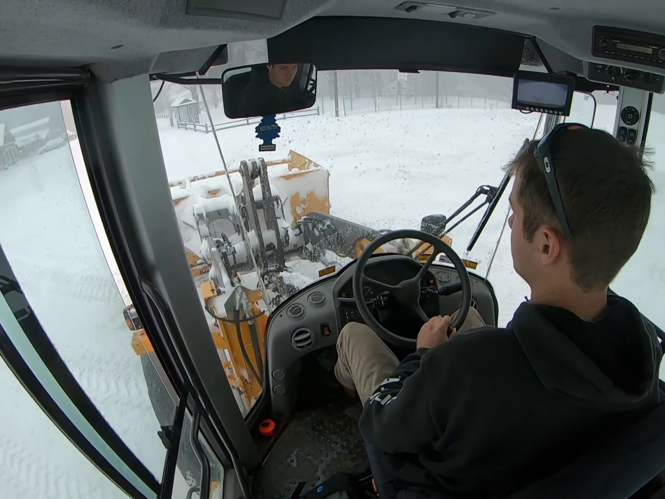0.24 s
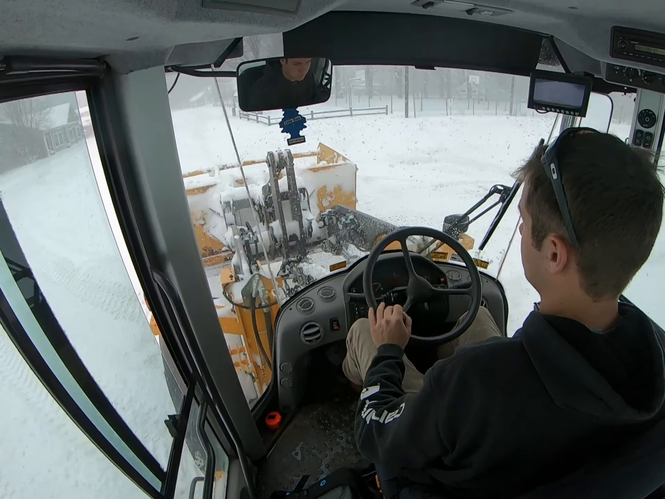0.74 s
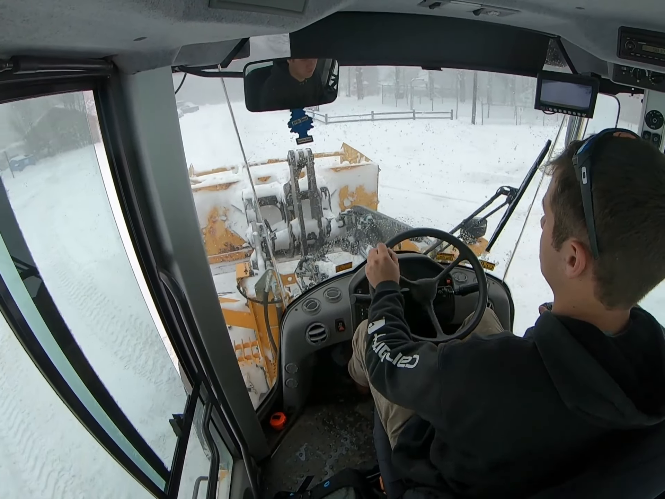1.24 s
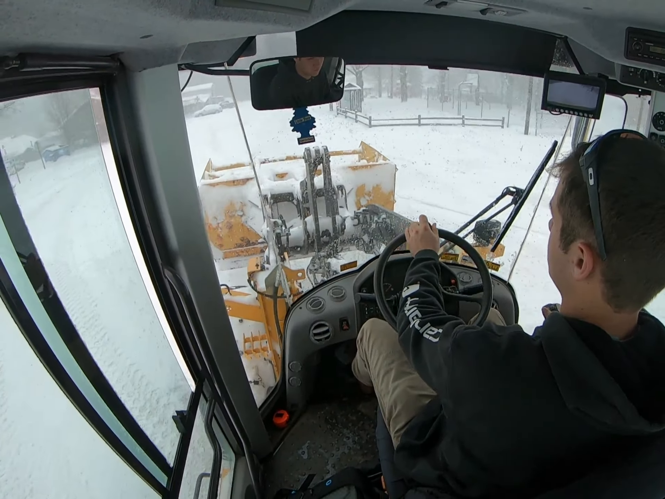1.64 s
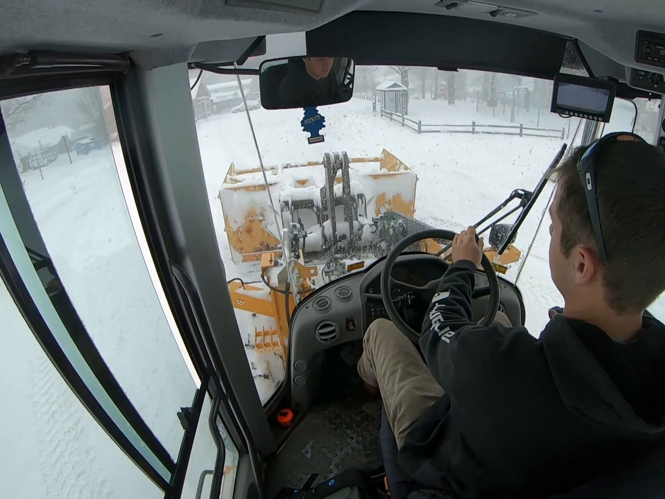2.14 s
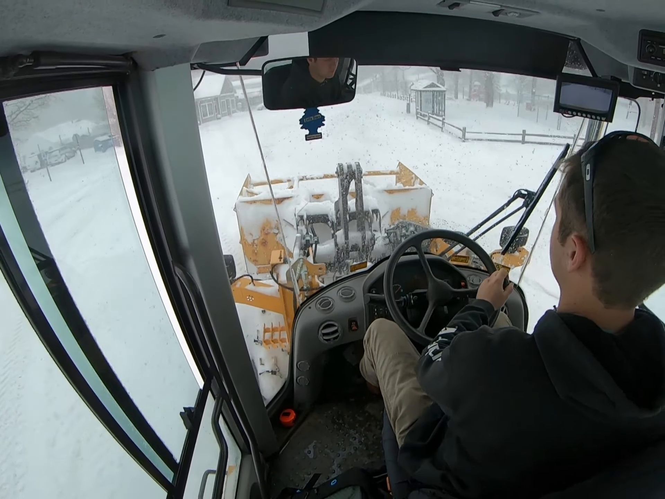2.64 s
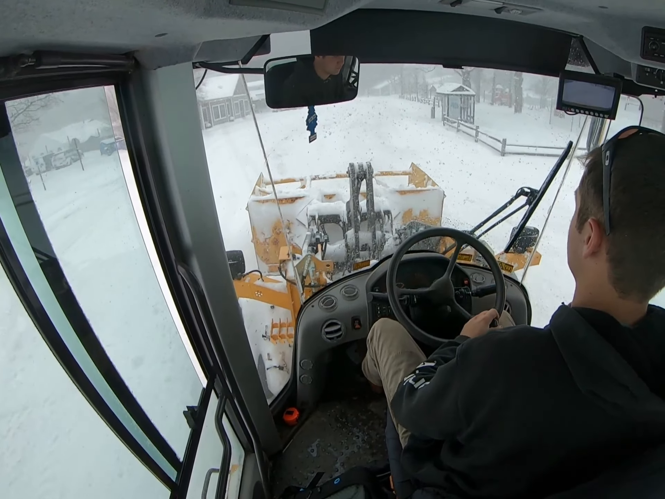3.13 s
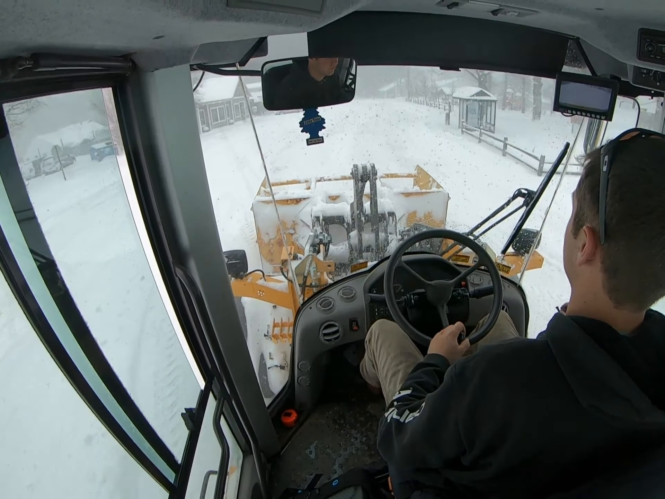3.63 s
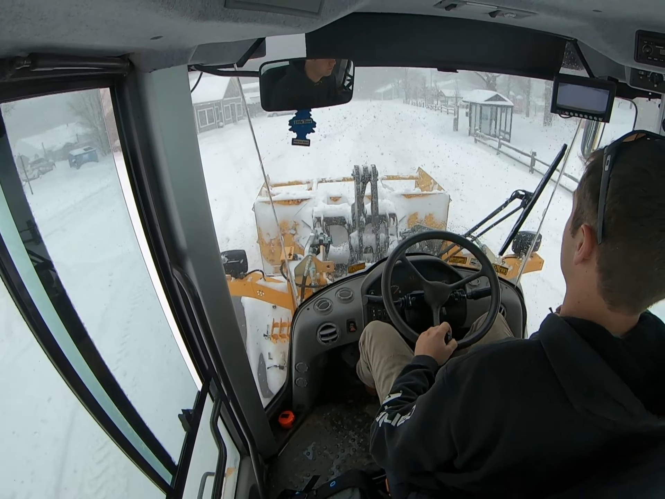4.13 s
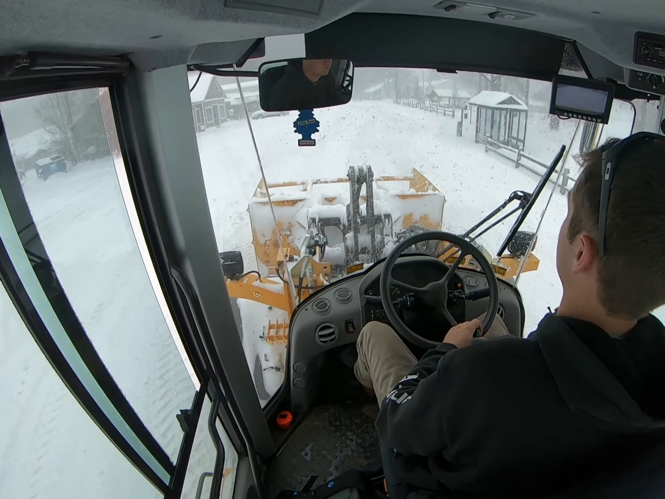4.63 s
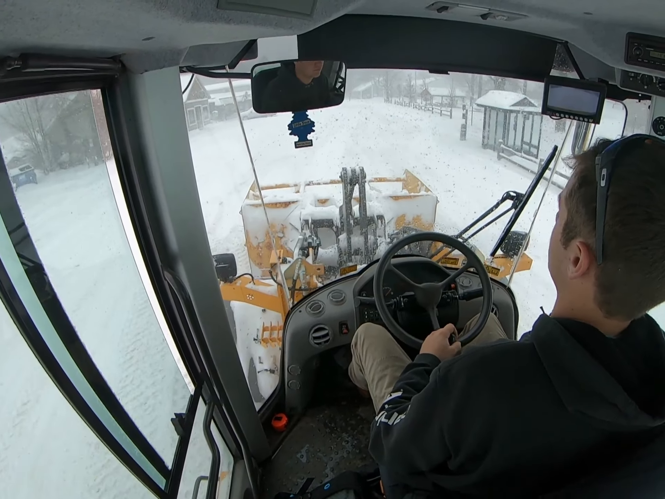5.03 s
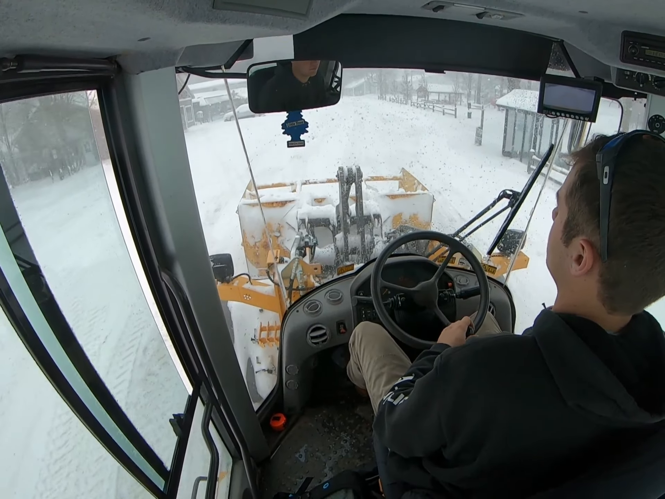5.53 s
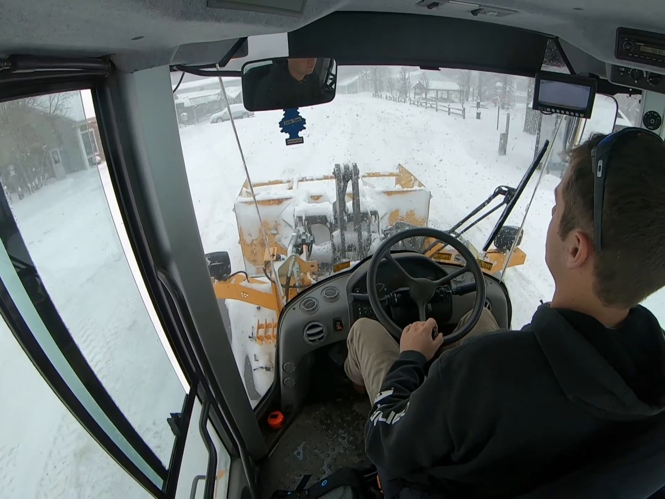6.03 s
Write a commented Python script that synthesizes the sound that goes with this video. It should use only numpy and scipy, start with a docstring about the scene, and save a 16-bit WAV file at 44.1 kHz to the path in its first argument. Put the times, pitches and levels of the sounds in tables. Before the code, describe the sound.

A wheel loader's diesel engine drones throughout, heard from one microphone inside the closed cab, with muffled mechanical clatter, whining pumps and gears, and a very deep, wavering cab boom. A small knock comes right at the start. The engine pitch rises noticeably during the first second, then keeps creeping upward. Uneven ground rumble from the tyres and plough fades toward 1.5 seconds and returns at about 2.7 seconds, along with a quick cluster of close knocks from loose plastic and metal fittings. From about 3.5 seconds the engine works harder and the hydraulic whine grows stronger, while faint gear tones swell, glide upward and fade. Single light rattles are scattered between 3 and 5 seconds, followed by a few tiny high ticks. The rumble is strongest near 5 seconds and eases slightly as the engine drones on to the end, just past 6 seconds.

```python
"""Wheel loader ploughing snow

One microphone inside the closed cab, as the loader pushes its plough and slowly gains speed.
A six-cylinder diesel drones and clatters through the wall, its pumps and gears whining.
The cab booms on its mounts, the ground rumbles through the frame, and loose fittings rattle."""
import sys
import numpy as np
from scipy import signal
from scipy.fft import rfft, irfft
from scipy.io import wavfile
from scipy.ndimage import uniform_filter1d, map_coordinates

SR = 44100
rng = np.random.default_rng(int(sys.argv[2]) if len(sys.argv) > 2 else 0)


def wav_record(signal):
    """Record a signal, one row per channel, as 16-bit PCM in the file named by sys.argv[1]."""
    frames = np.transpose(np.atleast_2d(signal))
    bounded = np.clip(frames, -1, 1)
    # unit amplitude maps onto the largest positive 16-bit level
    quanta = np.round(bounded * 32767).astype(np.int16)
    wavfile.write(sys.argv[1], SR, quanta)


N = 276507
CYLINDERS = 6


def amp(db):
    """Gain of a level in dB."""
    return 10 ** (np.asarray(db) / 20)


def unit_rms(x):
    """Scales x to rms 1."""
    return x / np.sqrt(np.mean(x ** 2) + 1e-20)


def curves(rows):
    """Turns rows of (time_s, values...) into one per-sample curve for each value."""
    time_s, *columns = np.transpose(rows)
    return [np.interp(np.arange(N) / SR, time_s, column) for column in columns]


def coloured(x, spectrum, peaks=()):
    """Filters x by (freq_hz, level_db) points and (centre_hz, width_hz, gain_db) peaks; rms 1."""
    points_hz, points_db = np.transpose(spectrum)
    hz = np.fft.rfftfreq(N, 1 / SR)
    shape_db = np.interp(np.log(hz + 1), np.log(points_hz + 1), points_db, -120, -120)
    return unit_rms(irfft(rfft(x) * amp(shape_db + resonance_db(hz, peaks)), N))


def resonance_db(hz, peaks):
    """Summed gain at hz of bell-shaped peaks and dips."""
    return sum(db / (1 + (2 * (hz - centre) / width) ** 2) for centre, width, db in peaks)


def drift(top_hz):
    """Slow random wander below top_hz, of rms about 1."""
    steps = rng.standard_normal(N // 512 + 40)
    lowpass = signal.butter(2, top_hz, fs=SR / 512, output="sos")
    steps = unit_rms(signal.sosfilt(lowpass, steps)[30:])
    return np.interp(np.arange(N) / 512, np.arange(len(steps)), steps)


def tone(turns, db, waver_db=1.0, waver_turns=.04, waver_hz=5):
    """A sine of rms level db that wavers a little in strength and phase."""
    phase = turns + rng.random() + waver_turns * drift(waver_hz)
    return np.sqrt(2) * amp(db + waver_db * drift(waver_hz)) * np.sin(2 * np.pi * phase)


def engine(cycles, load):
    """Diesel, hydraulic pump and crank-driven whines: tones shaded by load and by the cab's resonances."""
    # Engine harmonics: multiples of the four-stroke cycle rate
    harmonic_orders = [1, 2, 4, 7, 8, 11, 12, 14, 18, 21, 24, 26, 28, 32, 33, 38, 40, 42]
    # Their levels: unloaded_db, full_load_db
    harmonic_levels = [(-39, -42), (-31.5, -30), (-40, -38.5), (-33.5, -37.5), (-41, -38), (-33, -35.5),
                       (-39, -40), (-45.5, -42), (-59, -60), (-52.5, -55), (-56, -57.5), (-52, -53),
                       (-53, -53), (-55, -54.5), (-62.5, -59.5), (-61, -60.5), (-71.5, -74), (-71, -69)]
    # Whines of engine-driven parts: strokes_per_cycle
    whine_orders = [35, 36, 41.88, 45, 46.88, 53.25, 62, 66, 71.06, 75, 79.06, 82, 83.69, 88, 99.94, 105.06,
                    117.2, 125.62, 140.69, 176.06, 187.45, 210.88, 234.31, 257.81]
    # Their levels: unloaded_db, full_load_db
    whine_levels = [(-51.5, -57), (-50.5, -57), (-66.5, -67), (-75, -70.5), (-65, -66.5), (-67.5, -69),
                    (-66.5, -72.5), (-67, -73.5), (-67.5, -71.5), (-76, -68), (-72, -80.5), (-68, -82),
                    (-77.5, -71), (-63.5, -76), (-71, -70), (-69.5, -72), (-74, -73.5), (-73.5, -80.5),
                    (-69, -72), (-70.5, -77.5), (-76, -77.5), (-78, -79), (-74, -76.5), (-80.5, -77.5)]
    # Cab resonances and three dead spots that the tones glide through: centre_hz, width_hz, gain_db
    cab_modes = [(90.5, 10, 5.5), (148.5, 14, 6.5), (164, 10, 5), (269.4, 16, -13.5), (413.5, 5.3, 3),
                 (510, 35, 4.5), (738, 7.4, 8), (1390, 15, 3.5), (1922, 21, 9), (2178, 16, 8),
                 (2222, 30, 8), (2250, 12, -4), (2280, 45, 9), (2630, 90, 6), (2697, 14, 9), (2730, 30, -6),
                 (2814, 18, 16), (3592, 20, 5), (3760, 25, 5), (3905, 40, 6.5), (4135, 40, 5)]
    pump_order, hop = 17.74, 256  # strokes per cycle, samples
    cycle_hz = np.gradient(cycles[::hop]) * SR / hop

    def partial(order, unloaded_db, full_load_db, **waver):
        cab_db = np.repeat(resonance_db(order * cycle_hz, cab_modes), hop)[:N]
        level_db = unloaded_db + (full_load_db - unloaded_db) * load + cab_db
        return tone(order * cycles, level_db, **waver)

    out = partial(CYLINDERS, -25, -25, waver_db=.6, waver_turns=.012)  # firing note
    out += partial(9, -34.5, -32, waver_db=1.4, waver_turns=.018, waver_hz=2)
    out += partial(10, -30, -39.5, waver_db=1.4, waver_turns=.018, waver_hz=2)
    for order, levels_db in zip(harmonic_orders, harmonic_levels):
        out += partial(order, *levels_db, waver_db=3.0, waver_turns=.022, waver_hz=2.7)
    out += partial(pump_order, -40.5, -32.5)
    out += partial(2 * pump_order, -44, -54, waver_db=1.5, waver_turns=.02)
    for order, levels_db in zip(whine_orders, whine_levels):
        out += partial(order, *levels_db, waver_db=2.4, waver_turns=.08)
    return out


def clatter(cycles, level_db, repeat_db=-3.0, throb=0.14):
    """Valves, injectors and gears: knocks that return every cycle, and noise throbbing with each firing."""
    # Clatter as heard through the cab wall: freq_hz, level_db
    spectrum = [(450, -28.5), (600, -4.5), (660, -14), (830, -16.5), (1000, -12), (1400, -14),
                (2000, -14.5), (3000, -18), (4900, -27), (5400, -34), (6400, -39), (6800, -33.5),
                (7300, -38.5), (8300, -38.5), (9600, -46.5), (10300, -46), (11500, -60), (13000, -78)]
    # Cab wall resonances: centre_hz, width_hz, gain_db
    wall_modes = [(754, 87, 9.5), (900, 60, 4.5), (1184, 52, 6), (1612, 65, 6.5), (1940, 54, 1.5),
                  (2280, 71, 6), (2570, 29, 3.5), (2780, 97, 3), (3060, 45, 5), (3560, 90, 1.5),
                  (3980, 83, 4.5), (4420, 110, 4), (4650, 80, 3.5)]
    pattern = rng.standard_normal(2048)
    position = ((cycles + 0.00091 * drift(5.2)) * len(pattern)) % len(pattern)
    repeated = unit_rms(map_coordinates(pattern, [position], order=3, mode="grid-wrap"))
    firing_pulse = 1 + throb * np.cos(2 * np.pi * CYLINDERS * cycles)
    loose = rng.standard_normal(N) * firing_pulse * amp(1.4 * drift(30))
    return amp(level_db) * coloured(amp(repeat_db) * repeated + loose, spectrum, wall_modes)


def passing_whines(fade_share=0.23):
    """Whines, probably of gears, and one thin squeak: each swells in, glides evenly and dies away."""
    # Gliding tones: start_s, length_s, pitch_hz, climb_hz_per_s, level_db
    glides = [(-.2, .8, 402, 15, -41), (4.05, 2.6, 404, 29, -43), (3.15, 1.2, 476, 26, -46),
              (2.74, .53, 952, 50, -53.5), (3.75, .7, 1032, 72, -61), (2.685, .05, 8150, -11000, -72)]
    out = np.zeros(N)
    for start_s, length_s, pitch_hz, climb, level_db in glides:
        t = np.arange(N) / SR - start_s
        swell = np.clip(np.minimum(t, length_s - t) / (fade_share * length_s), 0, 1) ** 2
        turns = pitch_hz * t + climb * t ** 2 / 2
        out += swell * tone(turns, level_db, waver_db=2.5, waver_turns=.07, waver_hz=12)
    return out


def cab_drone(level_db):
    """Air and panels fill the cab with a low, gently wavering noise."""
    # Air and panel noise: freq_hz, level_db
    spectrum = [(12, -25), (20, -16.5), (45, -3.5), (75, -5), (100, -10), (125, -13), (165, -13.5),
                (215, -11.5), (265, -24.5), (340, -19.5), (480, -23), (550, -18.5), (600, -34.5),
                (660, -54), (900, -65.5)]
    return amp(level_db + drift(3.0)) * coloured(rng.standard_normal(N), spectrum)


def cab_boom(pitch_hz=24.2, climb_hz_per_s=0.93, skirt_hz=6, skirt_db=-5.5):
    """The cab bounces on its mounts: a wandering low tone with a noisy skirt, climbing with road speed."""
    # Strength of the bounce: time_s, level_db
    bounce_levels = [(0, -25), (.3, -24.5), (.7, -24), (1.12, -33.5), (1.31, -18.5), (1.7, -21.5),
                     (2.4, -24.5), (2.55, -18), (3.05, -18.5), (3.18, -36.5), (3.3, -16.5), (3.7, -22),
                     (4.25, -20.5), (4.5, -21), (5.0, -15.5), (5.15, -29), (5.3, -16), (5.65, -20.5),
                     (6.27, -21)]
    level_db, = curves(bounce_levels)
    t = np.arange(N) / SR
    turns = pitch_hz * t + climb_hz_per_s * t ** 2 / 2
    skirt = drift(skirt_hz) * np.cos(2 * np.pi * turns) + drift(skirt_hz) * np.sin(2 * np.pi * turns)
    bounce = tone(turns, 0, waver_turns=.25, waver_hz=1.66)
    return amp(level_db) * unit_rms(bounce + amp(skirt_db) * skirt)


def ground_rumble(level_db):
    """Tyres and blade shake the frame in uneven lumps."""
    # Rumble through the frame: freq_hz, level_db
    spectrum = [(25, -25), (35, -4.5), (60, -13.5), (90, 2), (120, -2), (160, 2.5), (200, -3.5),
                (226, -4.5), (245, -17), (275, -14), (330, -10.5), (400, -29.5), (560, -26), (620, -40.5),
                (800, -69.5)]
    return amp(level_db + 1.6 * drift(9.3)) * coloured(rng.standard_normal(N), spectrum)


def rattles(attack_s=0.0037, blow_s=.005, blow_db=-5):
    """Short bursts of close knocks shake loose plastic and metal in the cab."""
    # Bursts driving four groups of modes: start_s, low_db, low_mid_db, high_mid_db, high_db, decay_s
    bursts = [(0.04, -47, -40, -45, -59, 0.006), (2.741, -37, -49, -56, -72, 0.011),
              (2.795, -50, -60, -60, -75, 0.018), (2.859, -47, -62, -60, -56, 0.011),
              (2.895, -43, -53, -58, -75, 0.0099), (2.911, -34, -42, -47, -61, 0.008),
              (3.175, -64, -63.5, -48, -76, .005), (3.401, -54, -53.5, -47.5, -78.5, 0.006),
              (3.803, -51, -58, -56, -83, 0.01), (4.24, -59, -58, -60, -69, 0.0073),
              (4.789, -70.5, -60, -53, -77.5, 0.009), (4.963, -47, -52, -43, -83, .003),
              (5.097, -77, -80, -79, -63, .004), (5.132, -79, -78, -79, -61, .005),
              (5.656, -79, -79, -78, -65, .005), (5.714, -80, -79.5, -78, -64, .005),
              (5.749, -73, -78, -78, -64, 0.005), (5.987, -84, -77, -83, -64, .005)]
    # Modes of the fittings in those four groups: pitch_hz, width_hz, level_db
    mode_groups = [
        [(1000, 370, -6), (1700, 200, -4), (2093, 180, 0), (2260, 170, 2), (2560, 200, -2)],
        [(2980, 300, -4), (3400, 280, -2), (3680, 280, 1), (3950, 280, -4)],
        [(4350, 300, 0), (4670, 300, -2.5), (5100, 400, -9)],
        [(6800, 1100, -3), (8700, 1100, 1.5), (9800, 1000, -5)],
    ]
    knocks = np.zeros((len(mode_groups), N))
    t = np.arange(3000) / SR
    for start_s, *levels_db, decay_s in bursts:
        noise, lumps = rng.standard_normal((2, len(t)))
        envelope = (1 - np.exp(-t / attack_s)) * np.exp(-t / decay_s)
        burst = noise * envelope * amp(2.0 * unit_rms(uniform_filter1d(lumps, 60)))
        burst[round(blow_s * SR)] += amp(blow_db) * np.linalg.norm(burst)  # one harder blow
        burst *= np.linalg.norm(envelope) / np.linalg.norm(burst)  # the envelope sets the energy
        start = round(start_s * SR)
        knocks[:, start:start + len(t)] += amp(levels_db)[:, None] * burst
    return sum(ring(drive, modes) for drive, modes in zip(knocks, mode_groups))


def ring(knocks, modes):
    """Fittings ring in modes of alternating polarity; little sounds above the top one."""
    out = np.zeros(N)
    for k, (hz, width, db) in enumerate(modes):
        broad = signal.lfilter(*signal.iirpeak(hz, hz / (3 * width), SR), knocks)
        narrow = signal.lfilter(*signal.iirpeak(hz, hz / width, SR), broad)
        out += (-1) ** k * amp(db) * narrow * np.sqrt(SR / 2 / width)  # makes up for the narrow band
    top_hz = modes[-1][0]
    return signal.sosfilt(signal.butter(4, 1.15 * top_hz, fs=SR, output="sos"), out)


def scene():
    """Everything reaches one microphone in the cab."""
    # Rising engine speed: time_s, firing_hz
    engine_speed = [(0, 83.2), (.4, 87.4), (.6, 89.2), (.8, 90.4), (1.2, 91.5), (1.6, 91.9), (2.4, 92.1),
                    (2.8, 92.5), (3.2, 93.5), (4.4, 95.4), (5.2, 96.6), (6.27, 98.6)]
    # How hard the loader works: time_s, load (0-1), ground_db, clatter_db, drone_db
    effort = [(0, 0.02, -21.5, -45.5, -28.5), (.3, 0.24, -24.5, -45.5, -27), (.45, 0, -27.5, -46.5, -27),
              (.8, 0.3, -30.5, -48, -27), (1.5, 0.1, -38.5, -49, -27), (2.6, 0.02, -31, -48.5, -28.5),
              (2.75, 0.18, -23, -47.5, -25.5), (3.25, 0.2, -21.5, -50, -28),
              (3.5, 0.7, -22.5, -50.5, -27.5), (4.4, 0.88, -22.5, -49.5, -28),
              (4.9, 0.98, -20, -48.5, -27.5), (5.3, 1, -22, -48.5, -27), (6.27, 0.9, -27.5, -49, -24.5)]
    firing_hz, = curves(engine_speed)
    load, ground_db, clatter_db, drone_db = curves(effort)
    cycles = np.cumsum(firing_hz) / SR / CYLINDERS  # four-stroke cycles completed
    drone = cab_drone(drone_db)
    machinery = engine(cycles, load) + clatter(cycles, clatter_db) + passing_whines()
    return (drone + machinery + rattles() + cab_boom() + ground_rumble(ground_db))[None]


def record(dry, threshold_db=-17.5, cut_db_per_db=0.24, ceiling=.46, top_hz=15700):
    """Quick gain control holds down big swings, the input stage rounds peaks, and the top treble is cut."""
    power_db = 10 * np.log10(abs(uniform_filter1d(dry[0] ** 2, 500)) + 1e-12)
    over_db = np.maximum(power_db - threshold_db, 0)
    held = dry / amp(cut_db_per_db * uniform_filter1d(over_db, 400))
    rounded = held / (1 + (held / ceiling) ** 6) ** (1 / 6)
    lowpass = signal.firwin(511, top_hz, window=("kaiser", 9), fs=SR)
    padded = np.pad(rounded, ((0, 0), (255, 255)), "reflect")
    return signal.oaconvolve(padded, lowpass[None], "valid")


dry = scene()
out = record(dry)
wav_record(out)
```